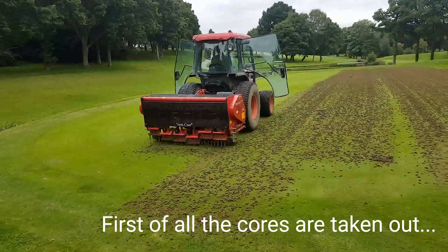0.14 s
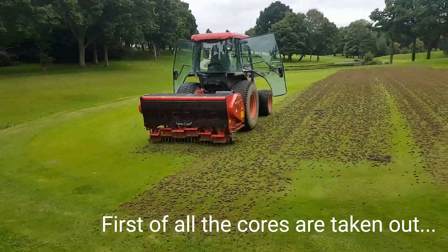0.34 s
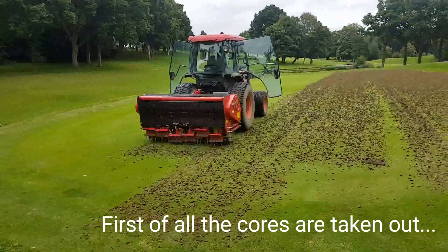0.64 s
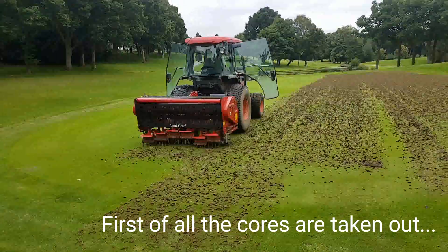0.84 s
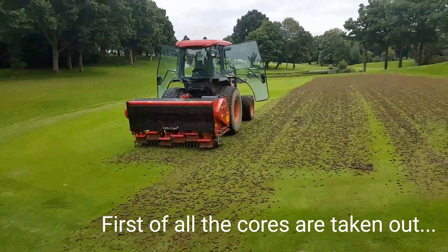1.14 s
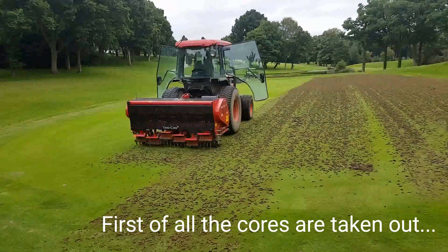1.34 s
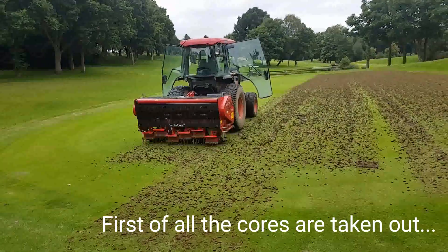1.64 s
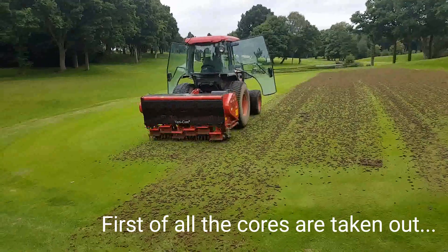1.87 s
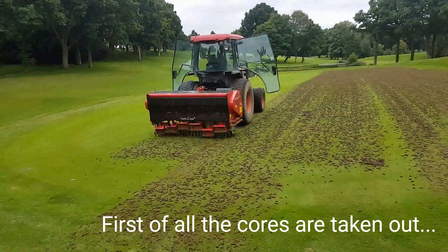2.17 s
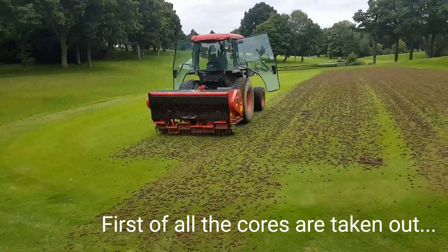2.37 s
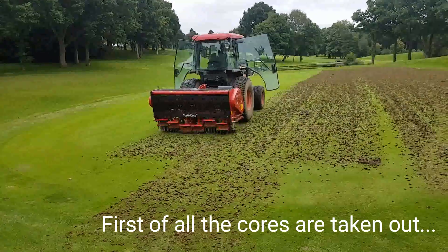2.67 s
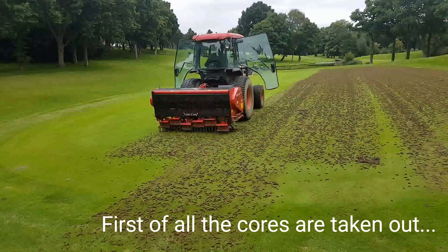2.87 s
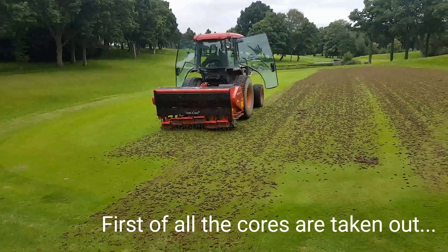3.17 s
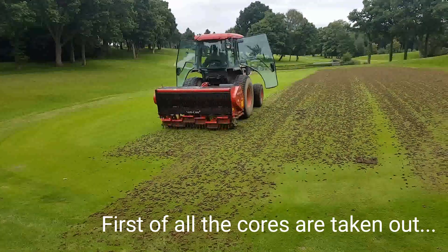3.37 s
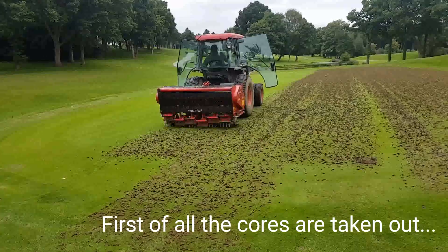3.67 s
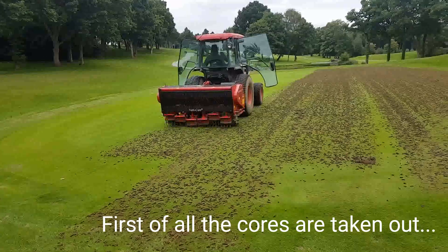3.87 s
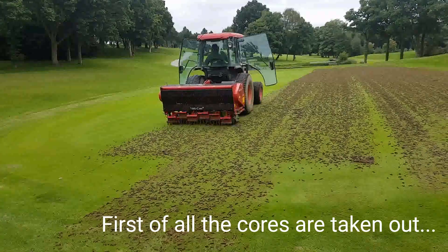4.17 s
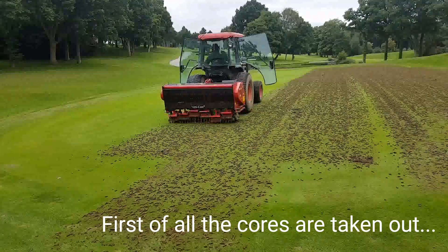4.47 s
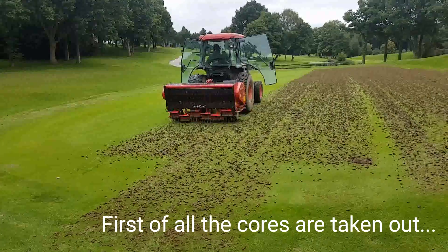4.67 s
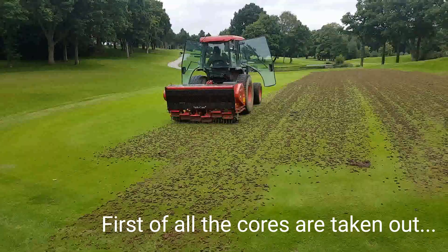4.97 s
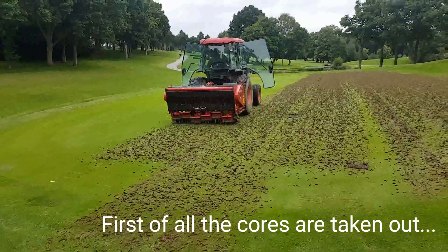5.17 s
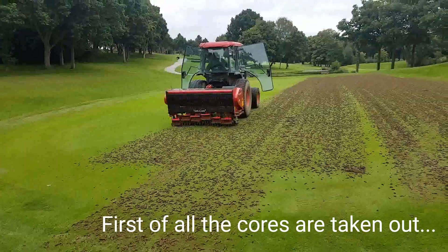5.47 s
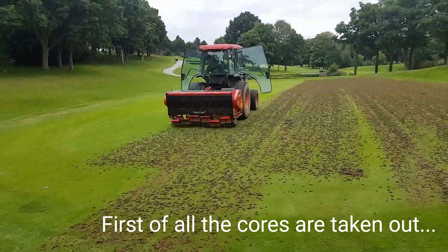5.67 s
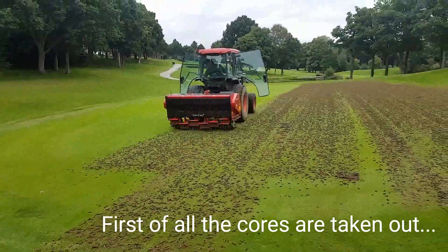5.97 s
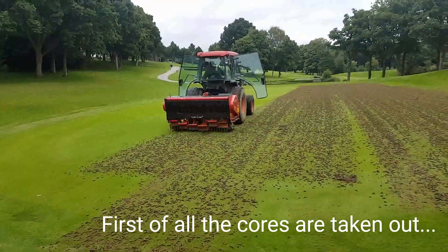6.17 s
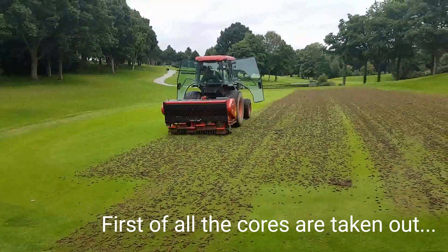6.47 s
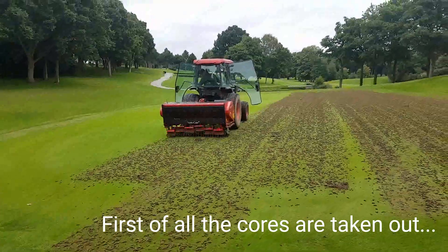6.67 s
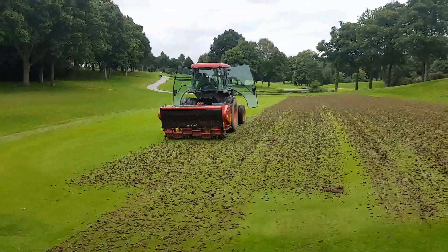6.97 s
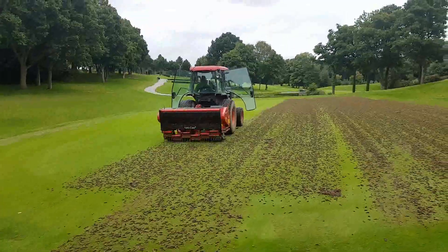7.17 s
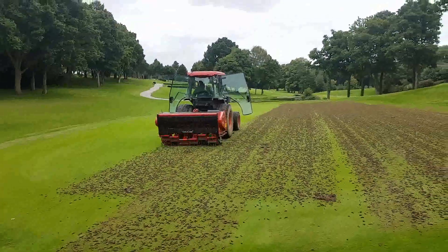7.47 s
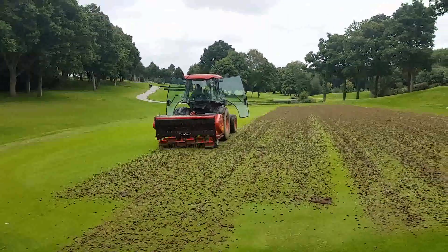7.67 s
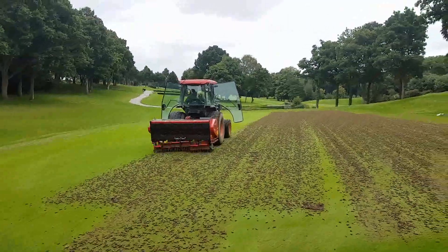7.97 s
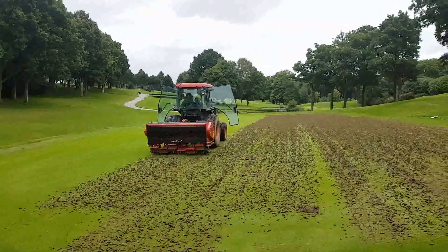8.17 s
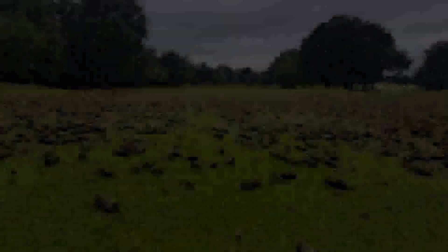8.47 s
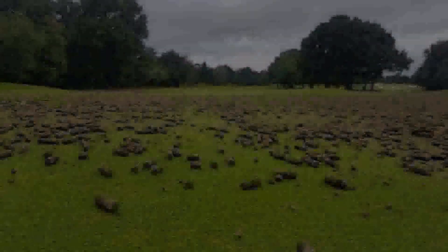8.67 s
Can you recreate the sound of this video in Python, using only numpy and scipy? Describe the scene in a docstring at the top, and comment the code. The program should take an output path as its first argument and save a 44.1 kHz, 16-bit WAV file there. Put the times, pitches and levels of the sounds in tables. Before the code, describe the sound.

A tractor's diesel engine drones and speeds up, then fast metallic clanks and soil scrapes join as aerator tines strike the ground.

```python
"""Tractor towing a coring aerator

A four-cylinder diesel creeps away over open turf and is throttled up to working speed. One crankshaft
drives the exhaust's drone and boom, the block's clatter, a ticking hiss and the gear whine. Loose tine
holders knock at first; then the tines punch the ground about nine times a second, each stroke a scrape
of soil with a steely rattle. The sound cuts off near the end."""
import sys
import numpy as np
from scipy import signal
from scipy.fft import rfft, irfft, next_fast_len
from scipy.io import wavfile
from scipy.ndimage import uniform_filter1d, map_coordinates

SR = 44100
rng = np.random.default_rng(int(sys.argv[2]) if len(sys.argv) > 2 else 0)


def generate_wav(sig):
    """Save sig (samples, or channels by samples) to the path in sys.argv[1] as 16-bit PCM at SR."""
    pcm = np.round(np.clip(np.atleast_2d(sig).T, -1, 1) * 32767).astype(np.int16)
    wavfile.write(sys.argv[1], SR, pcm)


N = 389824
TIME = np.arange(N) / SR

# exhaust drone: (multiple of the four-stroke cycle, level at low revs [dB], level at working revs [dB])
DRONE_LINES = [(4, -26.5, -27.2), (5, -50, -46), (6, -43, -44), (7, -35, -31.5), (8, -36, -28),
               (9, -46, -42), (10, -46, -42), (11, -39, -38), (12, -30, -35.5), (13, -35, -37),
               (14, -40, -40), (18, -47, -45), (22, -44, -50)]
# punch of each cylinder's puff, in firing order: (level [dB])
CYLINDER_PUNCH = [0, -4, -3, -5]
# colour of the exhaust boom at low and at working revs: (frequency [Hz], relative level [dB])
BOOM_LOW_COLOUR = [(25, -34), (50, -19), (80, -14), (110, -8), (165, -8), (190, -3.5), (210, 3.5),
                   (235, -6), (275, -5), (320, -18.5), (430, -20.5), (800, -51)]
BOOM_WORK_COLOUR = [(25, -44), (50, -17), (70, -12.5), (110, -8.5), (170, -6), (205, -2), (245, 3),
                    (280, -1), (320, -9), (430, -15), (800, -58)]
# colour of the engine block and panels, and of the hiss: (frequency [Hz], relative level [dB])
BLOCK_COLOUR = [(200, -26.5), (350, 0.5), (430, -4.5), (520, 1.5), (660, 0), (765, -4.5), (860, -1),
                (1020, 2), (1150, 0), (1245, -9), (1380, -2.5), (1570, -3), (1760, -8.5), (2080, -7.5),
                (2500, -21)]
HISS_COLOUR = [(1500, -3), (2500, -1.5), (2800, -1.5), (3250, 4.5), (3650, -1.5), (4050, -1), (4700, -6.5),
               (5500, -18), (6400, -9), (8000, -12), (9300, -29), (11500, -17.5), (13000, -22.5),
               (15800, -23)]
# gear whine: (multiple of the four-stroke cycle, level at low revs [dB], level at working revs [dB])
WHINE_LINES = [(32, -48, -43), (36, -35.5, -45), (72, -40, -60), (82, -38, -56), (180, -57, -66),
               (252, -52.5, -68), (288, -51, -80)]
# pitch of two more gear tones, which ease off at speed: (multiple of the four-stroke cycle)
MESH_MULTIPLES = (41, 216)
# the same two tones: (level at low revs [dB], level at working revs [dB])
MESH_LEVELS = [(-38.5, -35.5), (-48, -52.5)]
# how hard the tines bite, from the moment they reach the turf: (time [s], level [dB])
TINE_BITE = [(1.7, -55), (1.87, -39), (2.17, -38), (2.45, -39.5), (3.2, -40), (4.3, -40.5), (4.9, -40),
             (5.7, -42), (7.3, -40.5), (8.2, -43)]
# soft and hard spots in the turf that weaken or strengthen the strokes: (time [s], level change [dB])
TURF_SPOTS = [(2.66, 6), (2.78, -14), (2.89, 3), (3.44, -9.5), (4.08, -3), (4.64, 2.5), (5.5, -14.5),
              (5.83, -13), (6.46, -5), (6.81, -20), (7.48, -4)]
# loose tine holders knock while the tines are still raised: (time [s], level [dB])
LOOSE_KNOCKS = [(.062, -44), (.471, -51), (.563, -44)]
# ring of a steel tine holder: (frequency [Hz], relative level [dB], time to fall 60 dB [s])
HOLDER_MODES = [(1010, 3, .08), (1540, 2, .08), (2072, 3, .07), (2293, -2, .06), (3205, 1, .2),
                (3509, -2, .09), (3967, -3, .08), (4204, -4, .08), (4700, .5, .06), (4880, 2, .06),
                (5291, -3, .08), (6065, -4.5, .11), (6573, -5, .06), (6858, -6, .06), (7105, -7, .13),
                (7432, -4, .12), (8365, -14, .08), (9592, -22, .11), (10675, -18, .09), (11138, -15, .11),
                (11935, -17.5, .11), (12247, -18.5, .09)]
# colour of tines scraping through soil: (frequency [Hz], relative level [dB])
SCRAPE_COLOUR = [(400, -21), (1000, 4.5), (2000, 8), (2600, -3), (3300, -0.5), (4800, -3.5), (5700, -7.5),
                 (7000, -13), (8500, -19), (9700, -27.5), (11300, -21), (15000, -34.5)]
# stereo width of the noise layers: (frequency [Hz], left-right likeness [1 = mono])
STEREO_LIKENESS = [(60, 0.98), (110, 0.98), (200, 1.0), (380, 0.98), (700, 0.97), (1290, 0.91),
                   (2380, 0.75), (4400, 0.53), (8120, 0.12), (15000, -0.06)]
# colour difference between the two microphones: (frequency [Hz], left minus right [dB])
STEREO_LEAN = [(60, -1), (92, 1.5), (140, 0), (210, -1), (330, 1), (500, -1), (770, 0.5), (1170, -1.5),
               (1790, 2), (2740, 1), (4190, -3), (6410, -1), (9810, 7.5), (15000, -2.5)]
# quick closing fade: (time [s], level [dB])
FADE_OUT = [(8.2, 0), (8.235, -5), (8.25, -35), (8.28, -65), (8.5, -130)]

LOW_HZ, WORK_HZ = 66.06, 78.22  # firings a second at low and at working revs
THROTTLE_S, RUN_UP_S = 1.36, 2.05  # when the throttle opens, how long the engine takes to settle
START_M, SPEED_M_PER_S = 8.3, 0.81  # the tractor's distance at first, its pace away
FIRINGS_PER_STROKE, STROKE_PHASE = 8.5403, .78  # aerator gearing; share of its turn where the tines land


def crankshaft():
    """The governor eases the engine up to speed: revs (0 low, 1 working) and the running firing count."""
    revs = 1 - (1 - np.clip((TIME - THROTTLE_S) / RUN_UP_S, 0, 1)) ** 3
    return revs, np.cumsum(LOW_HZ + revs * (WORK_HZ - LOW_HZ)) / SR


def engine(revs, firings, rev_gain_db=2.5):
    """All engine layers ride one crankshaft, swelling with the revs and fading with distance."""
    cycle = firings / len(CYLINDER_PUNCH)
    distance_m = START_M + SPEED_M_PER_S * TIME
    swell = unit(amp(rev_gain_db * revs) / distance_m)
    machinery = block_clatter(cycle) + gear_whine(cycle, revs) + hiss(cycle, revs)
    # the low exhaust follows only about half of the swell and fade, in dB
    return swell ** 0.51 * exhaust(cycle, revs) + swell * machinery


def exhaust(cycle, revs, strain_db=1.5):
    """A drone and a rough boom that rise with the revs; uneven cylinders make the boom throb."""
    # the engine works harder while it gathers speed
    strain = uniform_filter1d(np.gradient(revs), SR // 2, origin=SR // 8)
    drone = tones(DRONE_LINES, cycle, revs, waver_db=2.2, waver_hz=11, drift_rad=.35)
    gas = puffs(cycle, decay=0.25, steady=0.36)
    boom_low = np.sqrt(1 - revs) * spread(noise() * gas, BOOM_LOW_COLOUR)
    boom_work = np.sqrt(revs) * spread(noise() * gas, BOOM_WORK_COLOUR)
    return amp(strain_db * strain / strain.max()) * drone + amp(-25.5) * (boom_low + boom_work)


def block_clatter(cycle):
    """Injectors and valves knock on the block and panels with ever new strength."""
    knocks = puffs(cycle, decay=.3, steady=3.7) * amp(0.78 * wobble(260))
    return amp(-24) * spread(noise() * knocks, BLOCK_COLOUR)


def aerator(blows, scrape_db, ring_db):
    """Every blow is a burst of scraping noise and the clank of a steel tine holder."""
    force, ring = np.zeros(N), np.zeros((2, N))
    for time_s, db in blows:
        start = round(time_s * SR)
        blow = amp(db) * plunge(rise_s=.003, hold_s=.015, decay_s=.018, scatter_db=3)
        rattle = blow * rng.standard_normal((2, len(blow)))
        clank = signal.fftconvolve(rattle, holder_ring(detune=.001, vary_db=1), axes=1)
        force[start:][:len(blow)] += blow
        ring[:, start:][:, :clank.shape[1]] += clank
    return amp(scrape_db) * force * spread(noise(), SCRAPE_COLOUR) + amp(ring_db) * ring


def strokes(firings, jitter_s=.002, scatter_db=1.5, spot_half_s=.07):
    """Gearing sets the rhythm of the tines and turf their strength: (time [s], level [dB])."""
    turns = firings / FIRINGS_PER_STROKE - STROKE_PHASE
    times = np.interp(np.arange(int(turns[-1])), turns, TIME)
    level_chance, time_chance = rng.standard_normal((len(times), 2)).T
    spots_db = sum(db * np.exp(-((times - s) / spot_half_s) ** 2) for s, db in TURF_SPOTS)
    levels = np.interp(times, *np.transpose(TINE_BITE)) + spots_db + scatter_db * level_chance
    landings = times + jitter_s * time_chance
    return [(s, db) for s, db in zip(landings, levels) if TINE_BITE[0][0] < s < FADE_OUT[0][0]]


def plunge(rise_s, hold_s, decay_s, scatter_db):
    """The force of one plunge: a flurry of quick steel and soil contacts."""
    t = np.arange(SR // 8) / SR
    contacts = map_coordinates(rng.standard_normal(80), [t * 600])
    attack = 1 - np.exp(-(t / rise_s) ** 2)
    release = np.exp(-np.maximum(t - hold_s, 0) / decay_s)
    return attack * release * unit(amp(scatter_db * contacts))


def holder_ring(detune, vary_db):
    """The ring of one steel tine holder; each is tuned and struck a little differently."""
    t = np.arange(SR // 6) / SR
    ring = np.zeros((2, len(t)))
    for hz, db, t60 in HOLDER_MODES:
        envelope = amp(db + vary_db * rng.normal() - 60 * t / t60)
        pitch_hz = hz * (1 + detune * rng.normal())
        ring += envelope * np.sin(2 * np.pi * (pitch_hz * t + rng.random((2, 1))))
    return ring / np.linalg.norm(ring[0])


def gear_whine(cycle, revs, dip_db=4, fade_db_per_s=2.3):
    """Meshing gears sing with the revs; two tones dip during the run-up and ease off after it."""
    whine = tones(WHINE_LINES, cycle, revs, waver_db=1.8, waver_hz=14, drift_rad=.3)
    mesh_lines = [(multiple, *levels) for multiple, levels in zip(MESH_MULTIPLES, MESH_LEVELS)]
    mesh = tones(mesh_lines, cycle, revs, waver_db=1.5, waver_hz=18, drift_rad=.3)
    settled_s = np.maximum(TIME - THROTTLE_S - RUN_UP_S, 0)
    return whine + amp(-fade_db_per_s * settled_s - dip_db * np.sin(np.pi * revs)) * mesh


def hiss(cycle, revs, rev_lift_db=0.5):
    """The engine's top end: a flickering hiss that ticks at every firing."""
    ticking = puffs(cycle, decay=0.327, steady=4) * amp(1.03 * wobble(500) + 0.9 * wobble(11))
    return amp(-37.5) * unit(amp(rev_lift_db * revs)) * spread(noise() * ticking, HISS_COLOUR)


def puffs(cycle, decay, steady):
    """An envelope that leaps above a steady bed at every firing; decay is in firing periods."""
    firing = cycle * len(CYLINDER_PUNCH)
    punch = amp(CYLINDER_PUNCH)[firing.astype(int) % len(CYLINDER_PUNCH)]
    return unit(steady + punch * np.exp(-(firing % 1) / decay))


def tones(lines, cycle, revs, waver_db, waver_hz, drift_rad):
    """Partials locked to the crankshaft; the higher ones waver more."""
    out = np.zeros(N)
    for multiple, low_db, work_db in lines:
        looseness = min(multiple / 12, 1) ** 2
        # pipe and silencer delay the higher partials more, which smears each cycle's thump
        smear = .24 * multiple ** 2
        phase = 2 * np.pi * multiple * cycle - smear + looseness * drift_rad * wobble(waver_hz)
        level_db = low_db + revs * (work_db - low_db) + looseness * waver_db * wobble(waver_hz)
        out += np.sqrt(2) * amp(level_db) * np.sin(phase)
    return out


def spread(pair, colour):
    """Colour two unrelated signals and mix them to left and right; their middle has rms 1."""
    def response(hz):
        likeness = np.clip(along(STEREO_LIKENESS, hz), 0, 1)
        width = np.sqrt((1 - likeness) / (1 + likeness))
        roll_off = 1 / (1 + (hz / (2 * colour[-1][0])) ** 4)
        return amp(along(colour, hz)) * roll_off * np.array([np.ones_like(hz), width])
    mid, side = filtered(pair, response)
    return np.array([mid + side, mid - side]) / np.std(mid)


def filtered(x, response):
    """Equalise x with a gain curve over frequency."""
    size = next_fast_len(N + SR // 4)
    return irfft(rfft(x, size) * response(np.fft.rfftfreq(size, 1 / SR)), size)[..., :N]


def along(points, hz):
    """Read (frequency [Hz], value) points on a log axis."""
    point_hz, values = np.transpose(points)
    return np.interp(np.log(hz + 1), np.log(point_hz + 1), values)


def wobble(rate):
    """A smooth random curve, rate knots a second."""
    return map_coordinates(rng.standard_normal(int(N * rate / SR) + 4), [TIME * rate])


def noise():
    """Two unrelated white noises."""
    return rng.standard_normal((2, N))


def amp(db):
    """Decibels to gain."""
    return 10 ** (np.asarray(db) / 20)


def unit(x):
    """Scale to rms 1."""
    return x / np.sqrt(np.mean(x ** 2) + 1e-20)


def scene():
    """Tractor and aerator straight ahead in the open."""
    revs, firings = crankshaft()
    return engine(revs, firings) + aerator(strokes(firings) + LOOSE_KNOCKS, scrape_db=10.0, ring_db=8.0)


def record(dry):
    """Two microphones of different colour, a cut of the highest treble and a quick fade-out."""
    def response(hz, top_hz=15780):
        lean = amp(along(STEREO_LEAN, hz) * np.array([[.5], [-.5]]))
        return lean / lean.mean(axis=0) * (hz < top_hz)
    fade = amp(np.interp(TIME, *np.transpose(FADE_OUT)))
    return filtered(dry * fade, response)


dry = scene()
out = record(dry)
generate_wav(out)
```